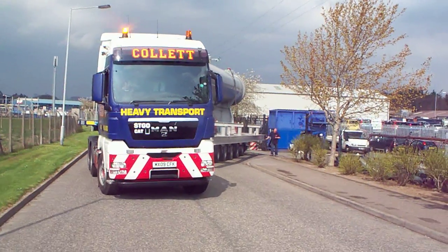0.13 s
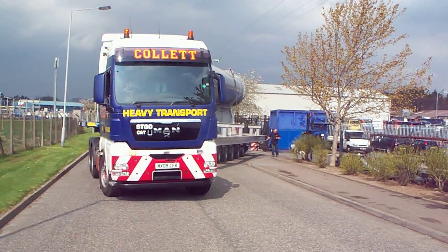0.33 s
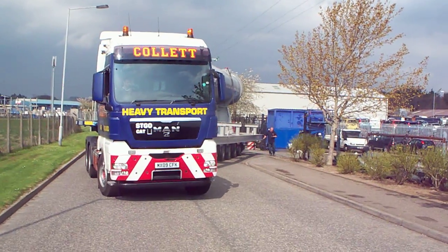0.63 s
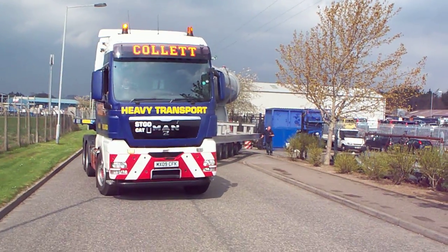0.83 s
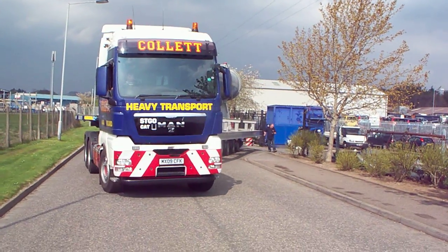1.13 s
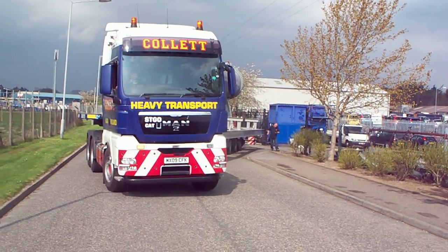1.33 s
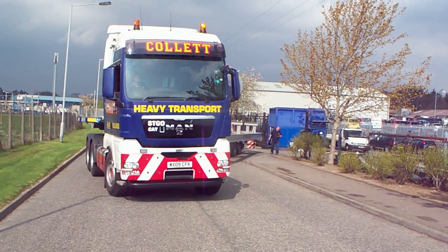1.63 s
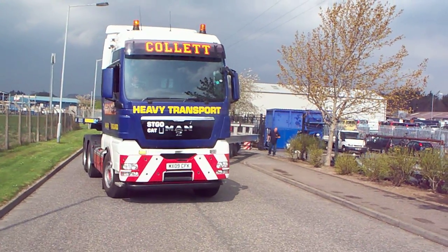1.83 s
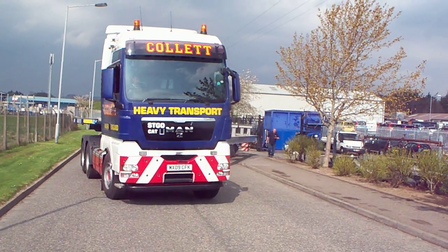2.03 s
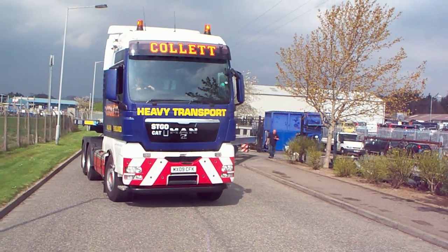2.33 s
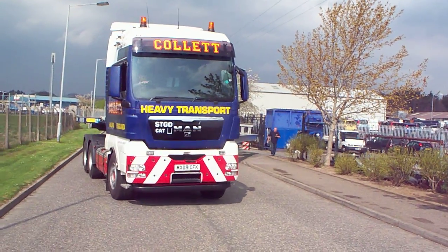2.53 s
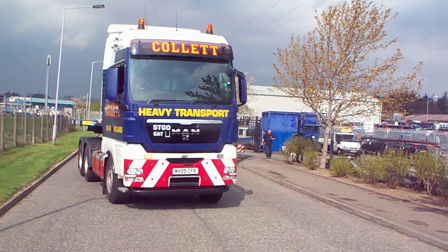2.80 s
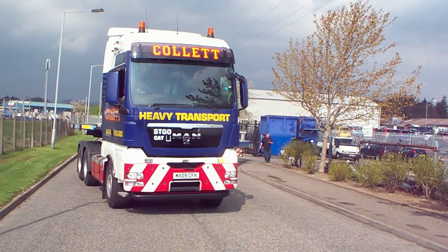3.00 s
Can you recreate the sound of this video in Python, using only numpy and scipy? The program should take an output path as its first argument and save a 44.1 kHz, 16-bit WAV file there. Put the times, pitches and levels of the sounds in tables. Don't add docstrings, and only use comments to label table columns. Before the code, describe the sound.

A heavy diesel truck crawls towards a small mono microphone on an open road, its low engine throb steady throughout, with leaking air hissing, spitting and faintly whistling on top while gusts buffet the microphone.

```python
import sys
import numpy as np
from scipy import signal
from scipy.fft import rfft, irfft, next_fast_len
from scipy.io import wavfile
from scipy.ndimage import uniform_filter1d, map_coordinates

SR = 44100
rng = np.random.default_rng(int(sys.argv[2]) if len(sys.argv) > 2 else 0)


def gain_from_decibels(decibels):
    exponent = np.asarray(decibels, float) / 20
    return 10 ** exponent


def transcribe(u):
    v = np.clip(np.atleast_2d(u).T, -1, 1)
    q = np.round(v * 32767).astype(np.int16)
    wavfile.write(sys.argv[1], SR, q)


N = 139356


def unit(x):
    return x / np.sqrt(np.mean(np.abs(x) ** 2) + 1e-20)


def along(points, hz):
    f, db = np.transpose(points)
    return np.interp(np.log(hz + 1), np.log(f + 1), db, left=-120, right=-120)


def curves(rows):
    seconds, *columns = np.transpose(rows)
    return [np.interp(np.arange(N) / SR, seconds, column) for column in columns]


def wobble(rate):
    return map_coordinates(rng.standard_normal(200), [np.arange(N) * rate / SR])


def filtered(x, response):
    size = next_fast_len(N + 8192)
    spectrum = rfft(x, size) * response(np.fft.rfftfreq(size, 1 / SR))
    return irfft(spectrum, size)[..., :N]


def rush(response, patchy_db):
    z = signal.stft(rng.standard_normal(N + 512), nperseg=512)[2]
    patches = uniform_filter1d(rng.standard_normal(z.shape), size=6, axis=0)
    patches = uniform_filter1d(patches, size=8, axis=1)
    noise = signal.istft(z * gain_from_decibels(patchy_db * unit(patches)), nperseg=512)[1][:N]
    return unit(filtered(noise, response))


def bursts(seconds, db, t60):
    attack_s = 0.001
    starts, t = np.zeros(N), np.arange(SR // 2) / SR
    np.add.at(starts, np.clip((seconds * SR).astype(int), 0, N - 1), gain_from_decibels(2 * db))
    shape = (1 - np.exp(-t / attack_s)) * gain_from_decibels(-60 * t / t60)
    return np.abs(signal.fftconvolve(starts, shape ** 2)[:N])


# time in seconds, firing rate in firings per second.
FIRING_RATE = [
    (0, 29.69),
    (.4, 29.32),
    (.8, 28.98),
    (1, 28.96),
    (1.2, 29.1),
    (1.6, 29.67),
    (2, 30.1),
    (2.4, 30.56),
    (2.8, 31.4),
    (3.16, 31.3),
]


def firings():
    return 0.57 + np.cumsum(curves(FIRING_RATE)[0]) / SR


# multiple of the firing rate, level at the start in dB, level at the end in dB.
EXHAUST_ORDERS = [(0.99, -23.5, -23.5), (2, -40, -44), (2.5, -51, -47.5), (3, -39, -45.5),
                  (11 / 3, -43, -45), (4, -38, -42.5), (13 / 3, -44, -44.5), (4.4, -49.5, -40),
                  (5, -55, -45), (6, -43, -50.5), (7, -39, -51.5), (8, -45.5, -54), (32 / 3, -61.5, -53),
                  (11, -51, -60), (20, -51, -49.5), (16, -49, -58.5)]


def exhaust():
    drift_db, locked_order, suck_turn = 1.5, 4, 0.47
    turn = 2 * np.pi * (firings() - suck_turn)
    progress = np.arange(N) / N
    tones = np.zeros(N)
    for k, (order, first_db, last_db) in enumerate(EXHAUST_ORDERS):
        level_db = first_db + (last_db - first_db) * progress
        if k > 0:
            level_db = level_db + drift_db * wobble(2)
        scattered = order > locked_order or order % 1 > 0
        lag = rng.uniform(0, 2 * np.pi) * scattered
        tones += gain_from_decibels(level_db) * np.cos(order * turn + lag)
    return -np.sqrt(2) * tones


# time in seconds, roar level in dB.
APPROACH = [
    (0, -32.5),
    (1, -31.5),
    (3.16, -30.5),
]
# frequency in Hz, level in dB per Hz.
ROAR_COLOUR = [(20, -34), (45, -6), (130, -2.5), (365, -10), (661, -10), (1940, -18), (3460, -28.5),
               (4300, -41), (5400, -73)]
# centre in Hz, width in Hz, lift over the roar in dB.
BODY_PANELS = [(322.5, 18, 3), (422, 59, 3), (526, 37, 7.5), (590, 36, 3), (786, 37, 5.5), (859, 110, 3.5),
               (1230, 47, 3.5), (1373, 26, 3), (1680, 23, 4), (1970, 450, 3), (2140, 40, 2),
               (2300, 27, 4.5)]


def block():
    knock_db, clatter_db = 1.3, 0.7

    def body(f):
        panels_db = sum(db / (1 + (2 * (f - centre) / width) ** 2) for centre, width, db in BODY_PANELS)
        return gain_from_decibels(along(ROAR_COLOUR, f) + panels_db)

    roar = rush(body, 0.8)
    turn = 2 * np.pi * firings()
    low = filtered(roar, lambda f: 1 / (1 + (f / 350) ** 4))
    below = filtered(roar, lambda f: 1 / (1 + (f / 1000) ** 4))
    knock_swell = np.cos(turn - 3.3) + 0.47 * np.cos(2 * turn - 5)
    knock = gain_from_decibels(knock_db * knock_swell + 0.17 * wobble(6.7)) * (below - low)
    clatter = gain_from_decibels(clatter_db * np.cos(turn - 4.5) + 0.3 * wobble(7.11)) * (roar - below)
    return gain_from_decibels(curves(APPROACH)[0] + 2.0) * (low + knock + clatter)


def leak_and_puffs():
    leak_db, puff_db, scatter_db, puff_t60_s = -3, 0.5, 1.8, 0.11
    times = np.flatnonzero(np.diff(np.floor(firings() - 0.25))) / SR
    sizes_db = puff_db + scatter_db * rng.standard_normal(len(times))
    return gain_from_decibels(2 * leak_db) + bursts(times, sizes_db, puff_t60_s)


def flicker(top_hz):
    return np.tanh(unit(filtered(rng.standard_normal(N), lambda f: f < top_hz)))


# frequency in Hz, level in dB per Hz.
JET_COLOUR = [(3800, -36.5), (4600, -6.5), (5600, -8), (6900, -0.5), (7400, -0.5), (7900, -7.5),
              (8550, -17), (9200, -44)]


def air_jet(seconds, spit_db, colour_hz, spit_t60_s):
    dull_hz, bright_hz, tint_width_hz, tint_db = 6650, 7470, 320, 5
    edge_hz, edge_sputter_db, sputter_db = 7950, 3.5, 1.5
    jet = gain_from_decibels(-44) * np.sqrt(leak_and_puffs()) * rush(lambda f: gain_from_decibels(along(JET_COLOUR, f)), 1.5)
    bright = np.clip((colour_hz - dull_hz) / (bright_hz - dull_hz), 0.03, 0.97)
    for share, centre in (1 - bright, dull_hz), (bright, bright_hz):
        def tint(f):
            bump_db = tint_db * np.exp(-((f - centre) / tint_width_hz) ** 2)
            return gain_from_decibels(along(JET_COLOUR, f) + bump_db)

        power = bursts(seconds, spit_db - 11.5 + 10 * np.log10(share), spit_t60_s)
        jet = jet + np.sqrt(power) * rush(tint, 0.81)
    edge = filtered(jet, lambda f: f > edge_hz)
    jet = jet - edge + gain_from_decibels(edge_sputter_db * flicker(150)) * edge
    return gain_from_decibels(sputter_db * flicker(250)) * jet


# time in seconds, pitch in Hz, level in dB.
WHISTLE_GLIDE = [
    (0, 4976, -44.5),
    (.57, 5040, -48.5),
    (.63, 5126, -44.5),
    (1, 5156, -42.5),
    (1.5, 5193, -46.5),
    (2.1, 5103, -45.5),
    (2.6, 5073, -46.5),
    (3.16, 4950, -50),
]


def whistle(seconds, spit_db, spit_t60_s):
    width_hz, skirt_hz, skirt_db = 120, 380, -12
    pitch, level_db = curves(WHISTLE_GLIDE)
    power = gain_from_decibels(2 * level_db) * leak_and_puffs() + bursts(seconds, spit_db - 6, spit_t60_s)

    def spread(f):
        return 1 / (1 + (f / width_hz) ** 2) + gain_from_decibels(skirt_db) * np.exp(-(f / skirt_hz) ** 2)

    a, b = filtered(rng.standard_normal((2, N)), spread)
    turn = 2 * np.pi * np.cumsum(pitch) / SR
    return np.sqrt(power) * unit(a * np.cos(turn) + b * np.sin(turn))


# start in seconds, jet peak in dB, whistle level in dB, jet colour in Hz.
AIR_SPITS = [(0.094, -30.5, -59, 6860), (0.3022, -28, -44, 6880), (0.4, -41, -48, 6930),
             (0.5716, -32, -48, 6630), (0.6694, -49, -43, 6320), (0.7771, -31.5, -39, 7050),
             (0.846, -34, -39, 7640), (0.947, -26, -29.5, 6650), (1.056, -30.5, -41, 6700),
             (1.1223, -28.5, -37, 7440), (1.1594, -41.5, -33, 6830), (1.2645, -41.5, -50, 6840),
             (1.3646, -26.5, -37, 6650), (1.4655, -26.5, -32, 7440), (1.5618, -28, -34.5, 6630),
             (1.6053, -29.5, -44, 7600), (1.6661, -26, -49, 7260), (1.7325, -37, -34.5, 6940),
             (1.7684, -35, -36, 6800), (1.8994, -34, -37, 7120), (2.0294, -37, -31.5, 7200),
             (2.0657, -31.5, -38.5, 6880), (2.1365, -29, -33.5, 7650), (2.2009, -26, -53, 6760),
             (2.2926, -31, -40.5, 7030), (2.461, -30.5, -46, 7560), (2.6186, -37.5, -35, 6470),
             (2.7173, -26.5, -50, 7330), (2.8534, -33.5, -54.5, 7440), (3.0037, -37, -33, 7410)]


def valve():
    seconds, jet_db, whistle_db, colour_hz = np.transpose(AIR_SPITS)
    spit_t60_s = 0.25
    return air_jet(seconds, jet_db, colour_hz, spit_t60_s) + whistle(seconds, whistle_db, spit_t60_s)


# time in seconds, slow push in dB, flutter over the push in dB.
GUSTS = [(0, -28, -9), (.15, -44, -2), (.62, -50, 12), (.74, -35, -9), (.92, -31.5, 3.5), (1.08, -42, -1.5),
         (1.25, -33.5, 3), (1.42, -41, 2), (1.55, -28.5, -3), (1.9, -40, -1), (2.14, -40, -2),
         (2.25, -37, -4), (2.42, -26, -4), (2.6, -37.5, 6.5), (2.75, -25, -9), (2.95, -31.5, -6),
         (3.16, -28.5, -6)]
# frequency in Hz, level in dB per Hz.
PUSH_COLOUR = [(2, -11.5), (8, 3.5), (17, 1), (23, -11.5), (30, -12.5), (60, -48.5)]
# frequency in Hz, level in dB per Hz.
FLUTTER_COLOUR = [(20, -25), (34, -4), (50, 0), (70, -7), (110, -14), (200, -32), (500, -60)]


def wind():
    push_db, flutter_db = curves(GUSTS)

    def lumpy(colour):
        lumps = gain_from_decibels(2 * wobble(10))
        return unit(lumps * rush(lambda f: gain_from_decibels(along(colour, f)), 0.65))

    return gain_from_decibels(push_db) * (lumpy(PUSH_COLOUR) + gain_from_decibels(flutter_db + 0.5) * lumpy(FLUTTER_COLOUR))


def scene():
    return (exhaust() + block() + valve() + wind())[None]


def roll_off(x):
    return signal.sosfilt(signal.butter(12, 9010, fs=SR, output="sos"), x)


# centre in Hz, width in Hz, depth in dB.
HOUSING_DIPS = [(4190, 170, -7), (8000, 150, -4)]


def record(dry):
    def housing(f):
        return gain_from_decibels(sum(db * np.exp(-((f - centre) / width) ** 2) for centre, width, db in HOUSING_DIPS))

    return roll_off(filtered(dry, housing))


dry = scene()
out = record(dry)
transcribe(out)
```